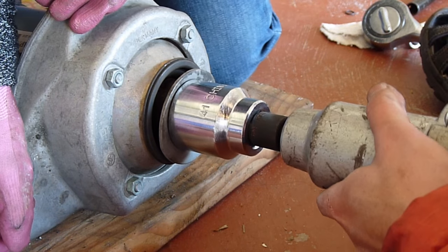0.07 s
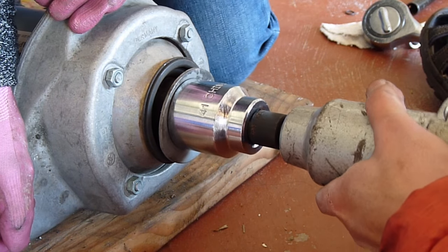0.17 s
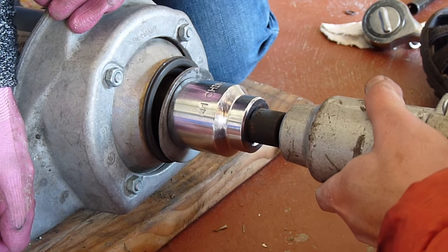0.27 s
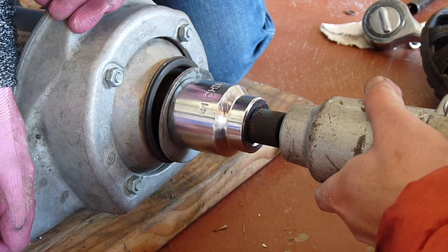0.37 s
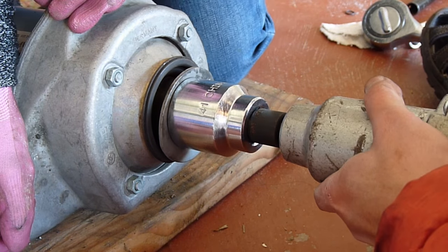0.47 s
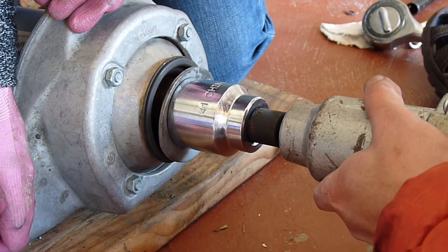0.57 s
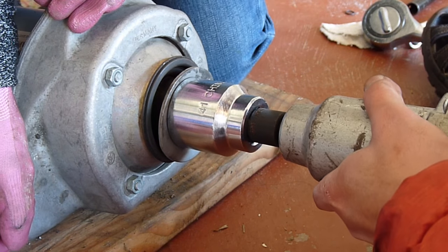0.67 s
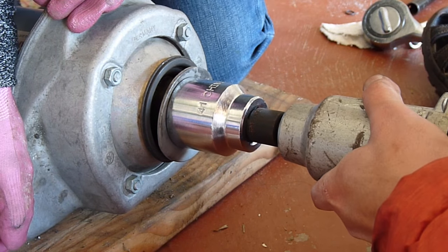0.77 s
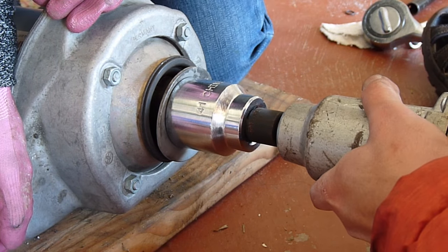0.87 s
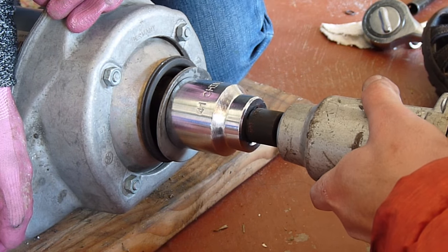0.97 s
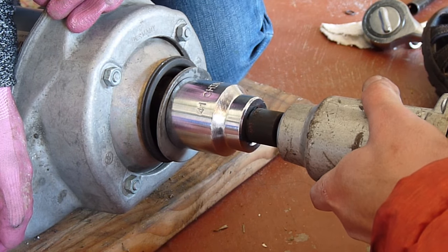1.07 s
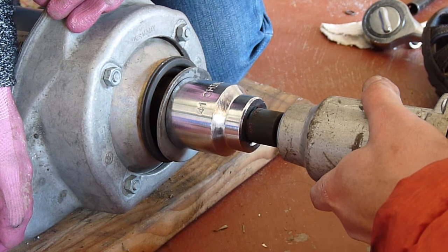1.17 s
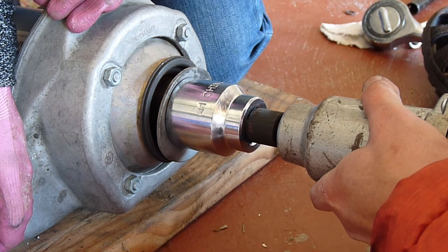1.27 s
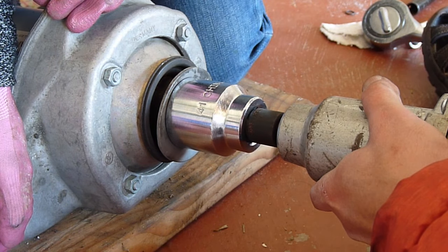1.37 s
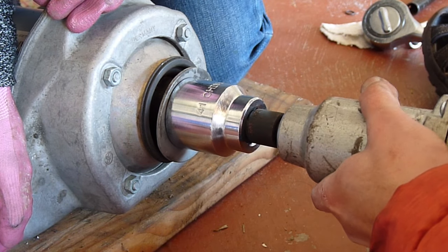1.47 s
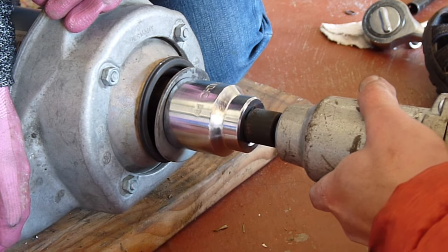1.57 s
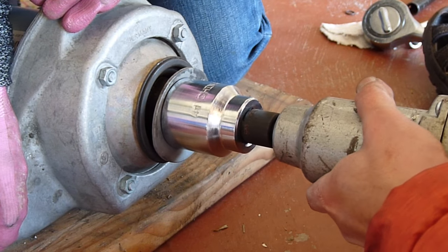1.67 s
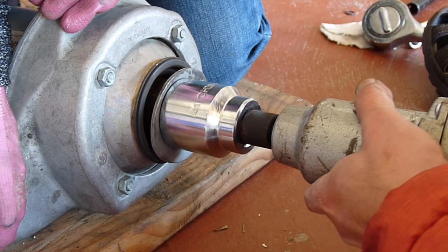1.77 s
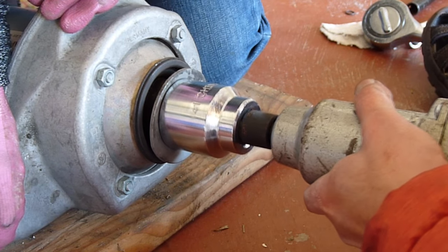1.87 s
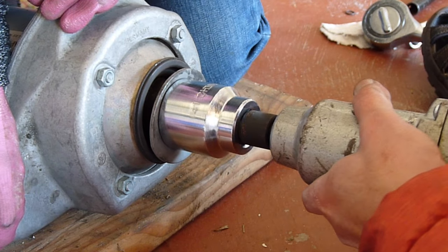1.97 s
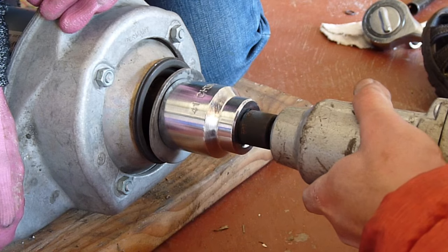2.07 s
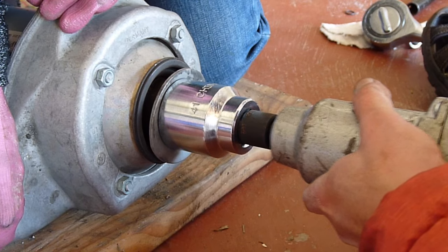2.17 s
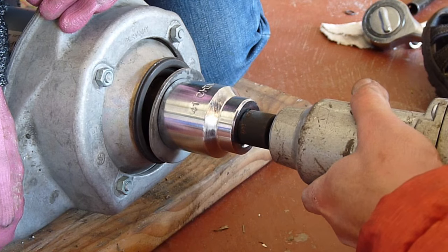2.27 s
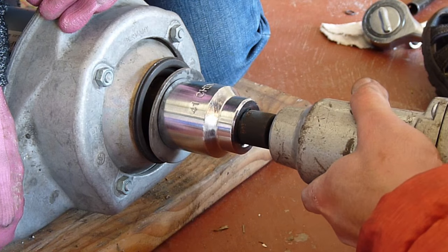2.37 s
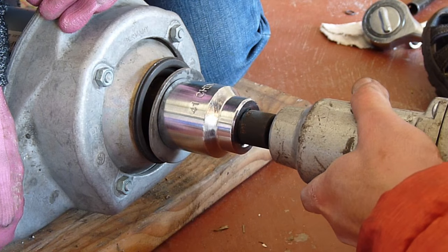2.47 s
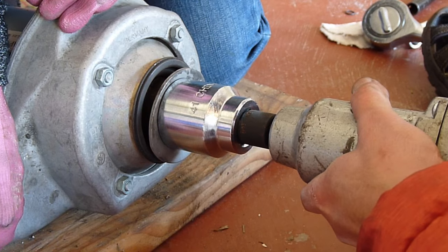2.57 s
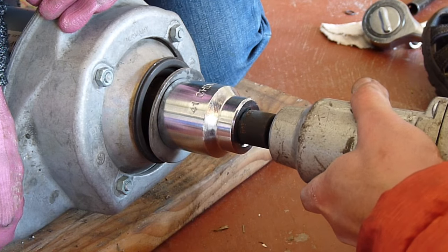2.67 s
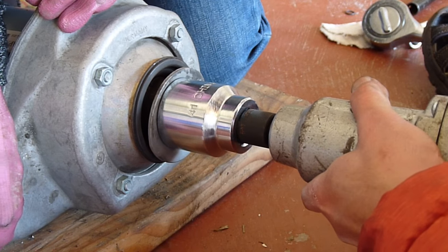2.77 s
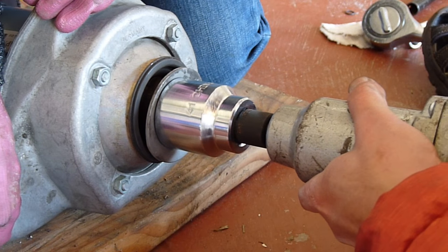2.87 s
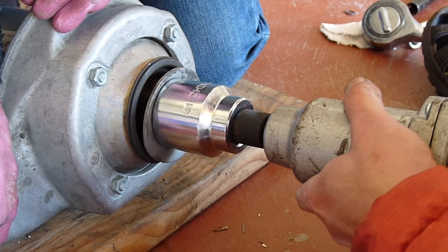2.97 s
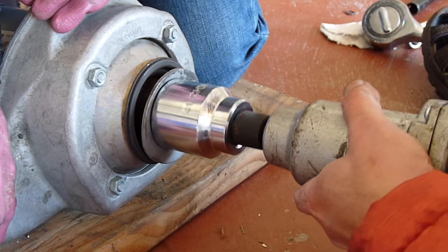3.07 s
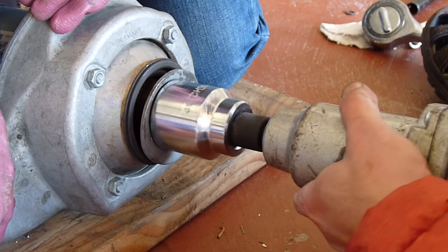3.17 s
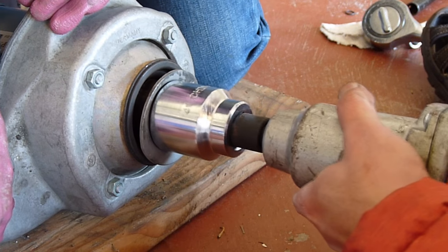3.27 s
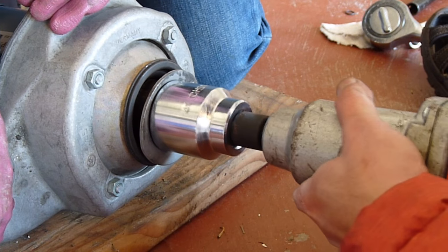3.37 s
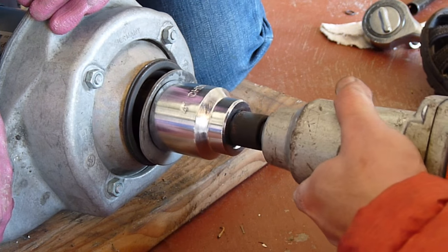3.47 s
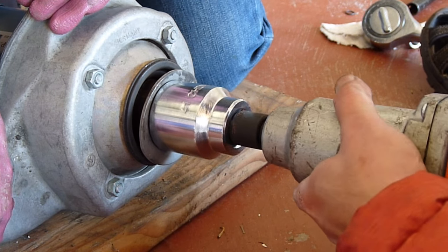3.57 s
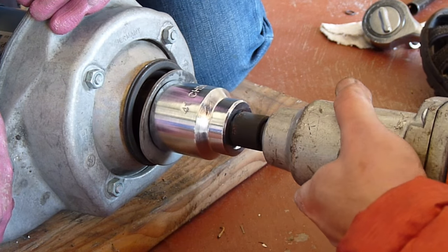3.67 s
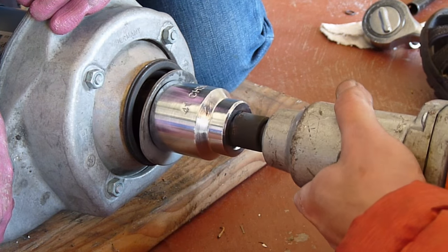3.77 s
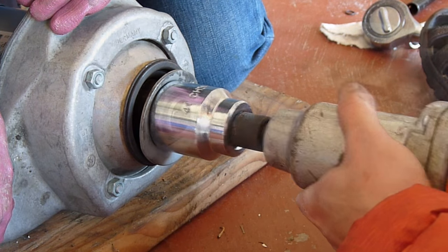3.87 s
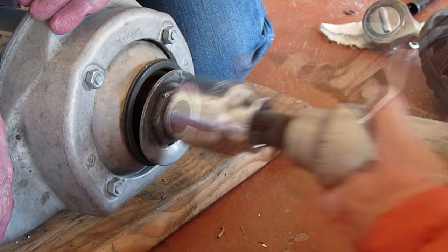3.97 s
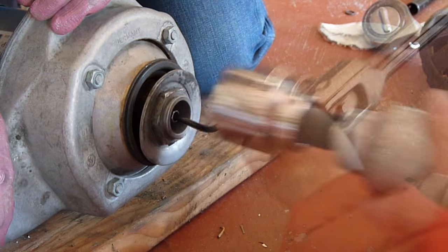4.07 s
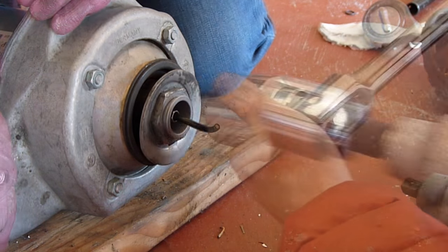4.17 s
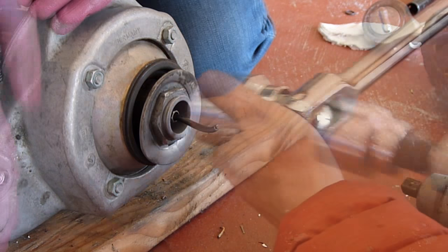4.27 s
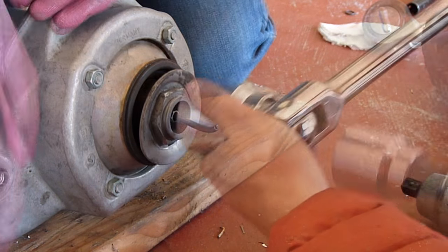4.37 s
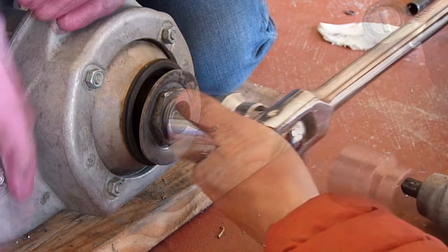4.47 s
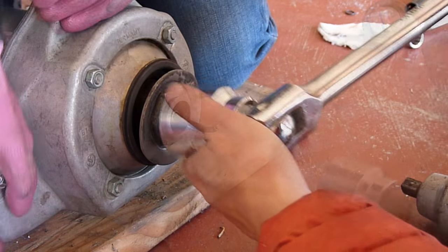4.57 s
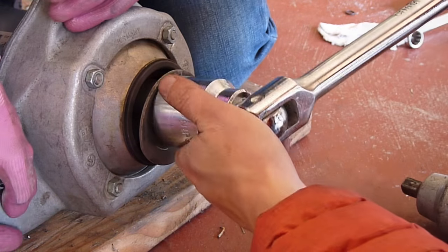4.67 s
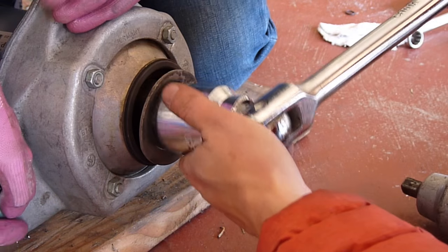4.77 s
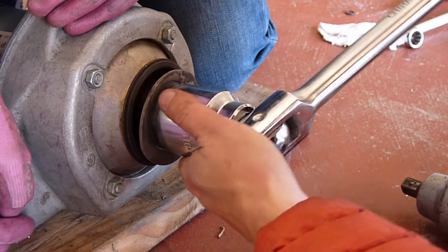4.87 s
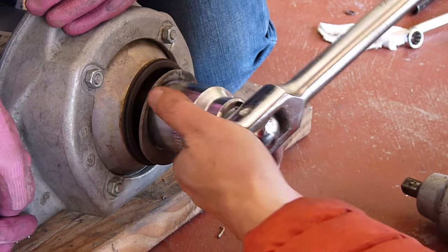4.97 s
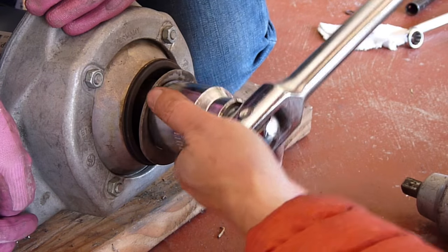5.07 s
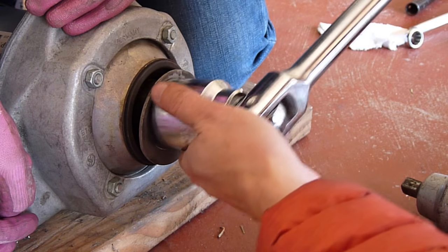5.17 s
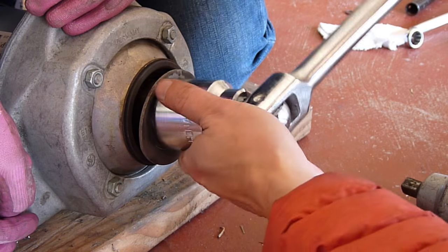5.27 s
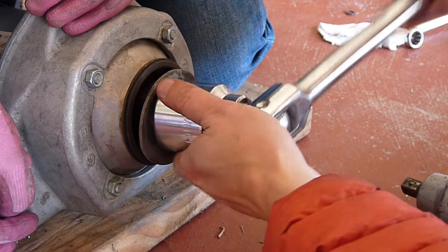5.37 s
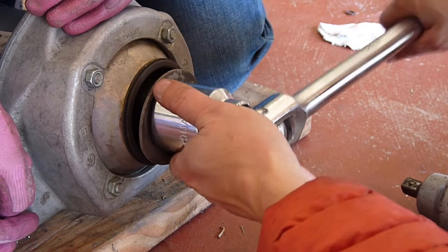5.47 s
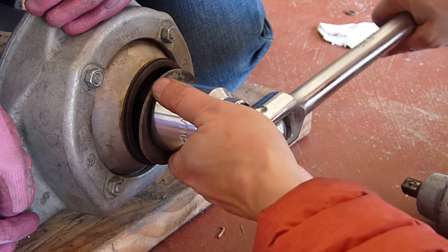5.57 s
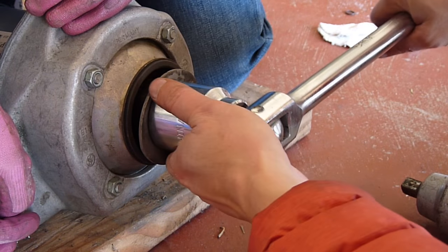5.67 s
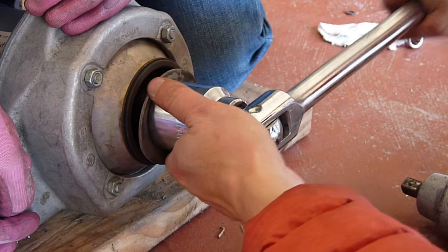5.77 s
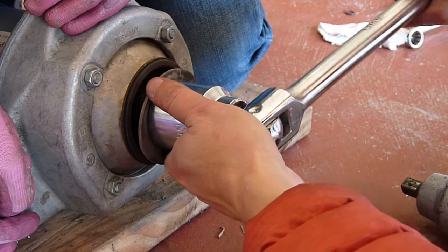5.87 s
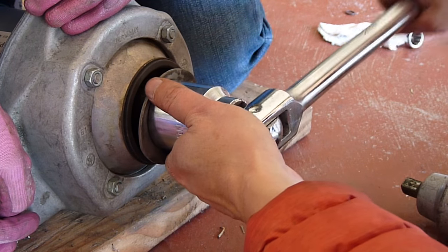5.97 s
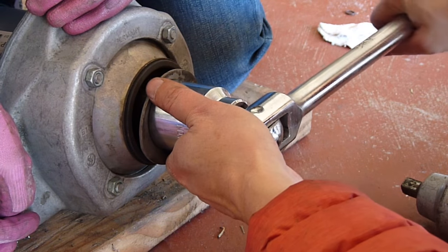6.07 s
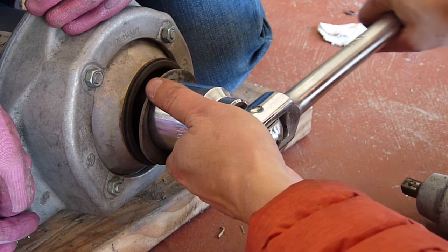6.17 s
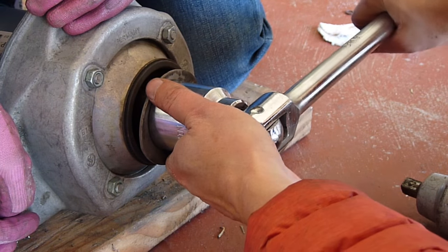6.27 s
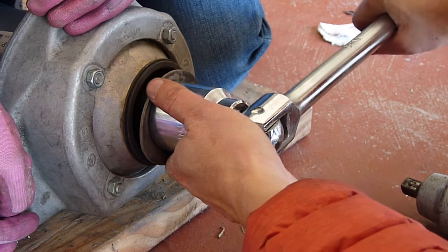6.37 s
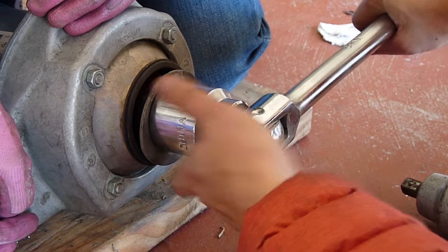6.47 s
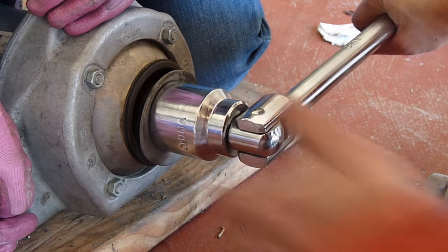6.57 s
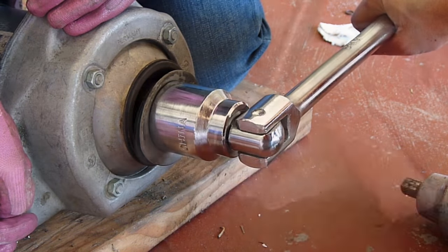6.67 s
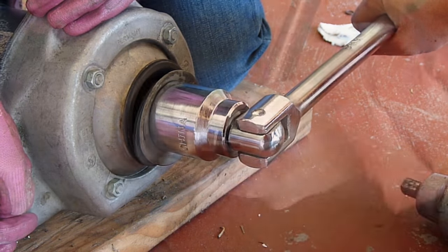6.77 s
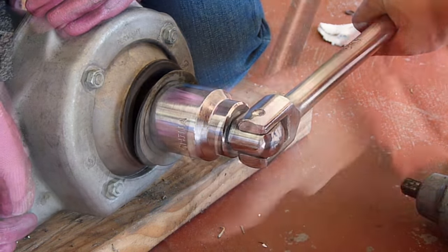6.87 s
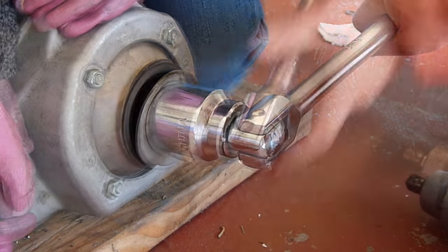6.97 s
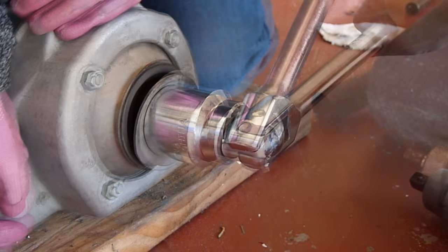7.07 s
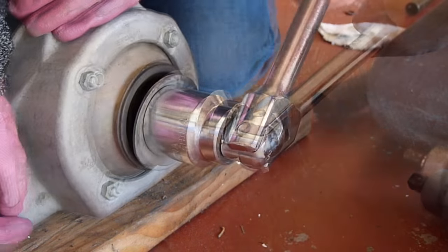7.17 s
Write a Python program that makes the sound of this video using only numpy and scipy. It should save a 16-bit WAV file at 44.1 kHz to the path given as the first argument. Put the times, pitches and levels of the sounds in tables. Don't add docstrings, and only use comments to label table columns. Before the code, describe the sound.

An impact wrench hammers in two rattling bursts that speed up and run down, then quiet socket knocks, one firm snap and sleeve rustle.

```python
import sys
import numpy as np
from scipy import signal
from scipy.io import wavfile
from scipy.ndimage import uniform_filter1d

SR = 44100
rng = np.random.default_rng(int(sys.argv[2]) if len(sys.argv) > 2 else 0)


def generate_wav(sig):
    pcm = np.round(np.clip(np.atleast_2d(sig).T, -1, 1) * 32767).astype(np.int16)
    wavfile.write(sys.argv[1], SR, pcm)


def makeup_ratio(level_db):
    decades = np.asarray(level_db, float) / 20
    return 10 ** decades


N = 319217

# (trigger pulled [s], released [s], first full blow [s], hammer stalls [s])
TRIGGER = [
    (1.5043, 1.7314, 1.562, 2.3),
    (2.726, 3.0979, 2.7755, 3.69),
]
# (top speed [blows/s], spin-up [s], coasting [s], drag [blows/s])
MOTOR = [
    (43.574, .0787, .9787, 38.975),
    (46.185, .1151, .6005, 13.773),
]
# (from [s], to [s], start level [dB], end level [dB])
LURCHES = [
    (1.485, 1.555, -48.5, -31),
    (2.746, 2.853, -42, -58.5),
]
# (time [s], peak [dB], brightness [dB])
LOOSE_HITS = [(1.503, -19, -24), (1.515, -16.5, -31.5), (1.528, -11.5, -27.5), (1.548, -28.5, -17),
              (1.554, -10.5, -21.5), (1.561, -18, -9.5), (2.153, -24, -13), (2.24, -26, -38),
              (2.425, -38, -28.5), (2.437, -39.5, -25), (2.479, -35.5, -41.5), (2.749, -53, 2.5),
              (3.725, -38, 1)]
# (time [s], deaf time [ms], jerk [dB])
CHOKES = [
    (1.7089, 2.8, -21),
    (1.7333, 6.3, -19.5),
    (2.940, 6.9, -22.5),
    (3.181, 9, -21),
    (3.237, 0.93, -21),
]
# (frequency [Hz], level [dB], t60 [s])
ANVIL_MODES = [(600, 0, .02), (950, -3, .02), (1340, -2, .02), (1560, -4, .02), (2185, -2, .035),
               (2880, -6, .02)]
# (frequency [Hz], level [dB], t60 [s])
HUB_MODES = [(365, 0.5, 0.12), (471, 2, 0.056), (630, 8, 0.02), (701, 17, 0.016), (890, -1.5, 0.021),
             (1380, -24, 0.071), (2265, -24, 0.13)]
# (frequency [Hz], density [dB per Hz])
WHIRR_TONE = [(200, -24.5), (350, 2), (470, -11), (600, 3.5), (950, -5), (1330, -6.5), (1700, -5.5),
              (2200, -8.5), (2700, -11.5), (3300, -19), (3650, -27), (4400, -27.5), (7000, -65),
              (9000, -78.5)]
# (time [s], peak [dB], brightness [dB], contact [s])
KNOCKS = [(4.736, -32, -17, 0.0042), (4.831, -28, -23, 0.0048), (4.867, -39.5, -14.5, 0.0037),
          (4.955, -46.5, -17, 0.0013), (5.067, -24, -21.5, 0.012), (5.171, -30, -46, 0.0048),
          (5.245, -28.5, -32, 0.0013), (5.414, -32.5, -22.5, 0.0023), (5.478, -33, -45, 0.0024),
          (5.505, -49, -32.5, 0.0027), (5.547, -36.5, -11, 0.0035), (5.56, -27.5, -34, 0.0015),
          (5.722, -34, -39, 0.0068), (5.772, -38.5, -44.5, 0.0059), (5.904, -58.5, -14.5, 0.0037),
          (5.915, -34.5, -17, 0.0038), (6.007, -41, -27, 0.0031), (6.126, -48, -36, 0.017),
          (6.142, -31, -16.5, 0.0037), (6.414, -43, -30, 0.0018), (6.567, -50.5, -4.5, 0.0044),
          (6.718, -44.5, -12, 0.0024), (6.755, -43.5, -5, 0.0074), (7.113, -41.5, -22, 0.0035)]
# (time [s], peak [dB], contact [s], top frequency [Hz])
TOUCHES = [
    (5.019, -35, 0.0042, 900),
    (5.035, -40, 0.0019, 1272),
    (5.366, -39.5, 0.0067, 835),
    (7.184, -43, 0.011, 296),
    (7.205, -36.5, 0.0098, 296),
    (7.18, -52, 0.013, 1182),
    (7.208, -43, 0.025, 1133),
]
# (time [s], level [dB], frequency [Hz], t60 [s])
SEATING = [
    (5.0521, -12.3, 540, .009),
]
# (peak [s], scrape level [dB], rise [s], fall [s], dull drag level [dB])
STROKES = [
    (4.371, -64, 0.47, 0.12, -78),
    (4.619, -60, 0.28, 0.23, -71.5),
    (4.861, -65, 0.14, 0.23, -66),
    (5.181, -62.5, .2, 0.13, -56),
    (5.299, -76, 0.36, 0.36, -58),
    (5.548, -75.5, 0.28, 0.13, -62),
    (6.72, -59, 0.22, 0.13, -67.5),
    (6.869, -62, 0.26, 0.31, -56),
    (7.2, -60.5, 0.11, .1, -67.5),
]
# (frequency [Hz], density [dB per Hz])
RUSTLE_TONE = [(180, -40.5), (300, -3), (480, 5), (534, -7), (1580, -6), (2170, -12), (3200, -19),
               (4050, -32.5), (5000, -43), (6500, -66.5), (11000, -120)]
# (frequency [Hz], t60 [s])
SHOP_DECAY = [(200, 0.2), (1000, 0.16), (3000, 0.09)]
FAR_TONE = [(15, -53), (25, -12), (32, -14), (54, -27.5), (86, 2), (128, -2.5), (200, -1.5), (306, -11),
            (341, -11), (489, -15), (763, -13), (985, -23.5), (1330, -26.5), (2120, -39), (4000, -54.5),
            (5200, -84.5), (8800, -120)]
FAR_LEVEL = [(0, -43.5), (.87, -45.5), (1.5, -48), (2.3, -67), (2.55, -66.5), (2.75, -65), (3.7, -77.5),
             (3.95, -75.5), (4.15, -75), (4.8, -85)]
# (frequency [Hz], density [dB per Hz])
LATE_TONE = [(15, -34), (25, -16), (33, -41), (115, -2), (273, -14), (386, -18.5), (441, -25), (515, -20),
             (624, -25.5), (687, -22), (1180, -33.5), (1250, -37), (2500, -52), (3250, -68), (5500, -120)]
# (frequency [Hz], level [dB])
WHINE = [(6659, -90)]
# (time [s], offset [steps])
OFFSET_STEPS = [(2.7, -5.6), (3.78, -6.85), (3.96, -6.45), (4.09, -6), (4.2, -5.55)]

FULL_SPEED_PER_S, REBOUND_TURN, CRACK_LEAD_S = 42, .26, .0018
CRACK_DB, CRACK_SPREAD_DB, CRACK_SLOPE_DB, BRIGHT_DB, BRIGHT_SPREAD_DB = -23, 1.5, -1, -10, 4
REBOUND_DB, REBOUND_LOSS_DB = -18, 26
RING_SPREAD_DB, ANVIL_RING_DB, HUB_RING_DB = 2.5, -5, -1.5
JOLT_DB, JOLT_SPREAD_DB = -24.5, 1.2
JOLT_DRIVEN_SLOPE_DB, JOLT_COAST_SLOPE_DB = 24, 36
WHIRR_DB, WHIRR_FADE_DB_PER_S = [-37.5, -40], [83.5, 170]
WHIRR_SLOPE_DB = 15
ENGAGE_DB, ENGAGE_S = -12, 0.036
RATTLE_DB, RATTLE_S = 3, 0.0077
SHAFT_HZ, SHAFT_WIDTH_HZ, SHAFT_DB = 2183, 30, 2
STROKE_DROP_DB = 20
DRONE_DB, LATE_DB, LATE_DRONE_DB, LAST_DB = -2.5, -59, -66.5, -57
FAR_PATCHY_DB = 1.0
MIC_HZ, MIC_SHELF_DB = 3200, -17.5
RATE_HZ, STEP, LATE_OFFSET_STEPS, CIRCUIT_DB = 16000, 1 / 1024, -5.9, -79.5
FADE_S, LAST_FADE_S = (3.93, 4.75), (6.94, 7.71)


def wrench():
    bursts = [(trigger, *hammer(*trigger, *motor)) for trigger, motor in zip(TRIGGER, MOTOR)]
    cracks = hammer_cracks(bursts)
    return cracks + makeup_ratio(-12) * shop(cracks) + hammer_jolts(bursts) + gears(bursts)


def hammer(pulled_s, released_s, first_s, stall_s, top, spin_up_s, coasting_s, drag):
    t = np.arange(N) / SR
    powered_s = np.clip(t - pulled_s, 0, released_s - pulled_s)
    held = top * (1 - np.exp(-powered_s / spin_up_s))
    coast = np.exp(-np.maximum(t - released_s, 0) / coasting_s)
    speed = np.maximum((held + drag) * coast - drag, 1)
    turns = np.cumsum(speed * (t >= first_s)) / SR + 1e-9 * t
    whole = np.arange(np.ceil(turns[round(stall_s * SR)]))
    blows = np.interp(whole, turns, t) + first_s * (whole == 0)
    return speed, blows, np.interp(whole + REBOUND_TURN, turns, t)


def hammer_cracks(bursts):
    cracks = np.zeros(N)
    for _, speed, blows, rebounds in bursts:
        for s, back_s in zip(blows, rebounds):
            share = speed[round(s * SR)] / FULL_SPEED_PER_S
            crack_db = CRACK_DB + CRACK_SLOPE_DB * share + CRACK_SPREAD_DB * rng.standard_normal()
            bright_db = BRIGHT_DB + BRIGHT_SPREAD_DB * rng.standard_normal()
            rebound_db = REBOUND_DB - REBOUND_LOSS_DB * share
            for hit_s, db, bright in [(s, crack_db, bright_db), (back_s, rebound_db, BRIGHT_DB)]:
                add(cracks, hit_s - CRACK_LEAD_S, strike(ANVIL_MODES, db - 4.5, bright, 0.0038, ANVIL_RING_DB))
    for s, db, bright_db in LOOSE_HITS:
        add(cracks, s, strike(HUB_MODES, db - 5.0, bright_db, 0.0035, -4))
    return cracks


def hammer_jolts(bursts):
    jolts, t = np.zeros(N), np.arange(-200, 900) / SR
    jolt = -np.exp(-(t / 0.0012) ** 2) + 0.017 * np.exp(-((t - .005) / 0.0083) ** 2)
    for (_, released_s, _, _), speed, blows, _ in bursts:
        for s in blows:
            if min(abs(s - row[0]) for row in CHOKES) > .005:
                slope_db = JOLT_COAST_SLOPE_DB if s > released_s else JOLT_DRIVEN_SLOPE_DB
                share = speed[round(s * SR)] / FULL_SPEED_PER_S
                db = JOLT_DB + slope_db * np.log10(share) + JOLT_SPREAD_DB * rng.standard_normal()
                add(jolts, s + t[0], makeup_ratio(db) * jolt)
    return jolts


def gears(bursts):
    now = np.arange(N) / SR
    gain = sum(level([(a, a_db), (b, b_db)]) for a, b, a_db, b_db in LURCHES)
    for (trigger, speed, blows, _), full_db, fade in zip(bursts, WHIRR_DB, WHIRR_FADE_DB_PER_S):
        _, _, first_s, stall_s = trigger
        turning = speed[np.minimum(np.arange(N), round(stall_s * SR))]
        last_blow = np.maximum(np.searchsorted(blows, now + CRACK_LEAD_S) - 1, 0)
        db = full_db + WHIRR_SLOPE_DB * np.log10(turning / FULL_SPEED_PER_S)
        db = db + RATTLE_DB * np.exp(-abs(now - blows[last_blow]) / RATTLE_S)
        db = db + ENGAGE_DB * np.exp(-abs(now - first_s) / ENGAGE_S)
        db = db - fade * np.maximum(now - stall_s, 0)
        gain = gain + (now > first_s) * makeup_ratio(db)
    motor = noise(WHIRR_TONE, 1.6, lo_hz=400, hi_hz=3500, size=256, drive=grit(3000, 1.5, .0015))
    singing = signal.lfilter(*signal.iirpeak(SHAFT_HZ, SHAFT_HZ / SHAFT_WIDTH_HZ, fs=SR), motor)
    return (motor + makeup_ratio(SHAFT_DB) * singing) * gain


def strike(modes, db, bright_db, contact_s, ring_db):
    t = np.arange(2600) / SR
    chatter = rng.standard_normal(len(t))
    ringing = np.zeros(len(t))
    for hz, mode_db, t60 in modes:
        luck, detune = rng.standard_normal(2)
        decay = makeup_ratio(mode_db + RING_SPREAD_DB * luck - 60 * t / t60)
        ringing += decay * np.sin(2 * np.pi * hz * (1 + .03 * detune) * t)
    fall = np.exp(-t / contact_s) + 0.073 * np.exp(-t / (5 * contact_s))
    contact = chatter * np.minimum(t / 0.00014, 1) * fall
    body = signal.fftconvolve(contact, ringing)[:len(t)]
    bright = band(contact * np.sign(chatter[::-1]), 1150, 3100, order=1)
    clack = band(contact, 190, 1350, order=4) + makeup_ratio(bright_db + 9) * bright
    sound = dull(makeup_ratio(ring_db) * evened(body) + evened(clack))
    return makeup_ratio(db) * sound / abs(sound).max()


def socket():
    x, t = np.zeros(N), np.arange(3000) / SR
    for s, db, bright_db, contact_s in KNOCKS:
        add(x, s, strike(HUB_MODES, db, bright_db - 1, contact_s, HUB_RING_DB))
    for s, db, contact_s, top_hz in TOUCHES:
        press = rng.standard_normal(len(t)) * t * np.exp(-2 * t / contact_s)
        touch = band(press, top_hz / 2, top_hz, order=3)
        add(x, s, makeup_ratio(db) * touch / abs(touch).max())
    for s, db, hz, t60 in SEATING:
        onset = np.sin(np.pi / 2 * np.minimum(t / .0012, 1))
        snap = -np.sin(2 * np.pi * hz * t) * onset * makeup_ratio(db + 7 - 60 * t / t60)
        add(x, s, band(snap, 130, 6500, order=1))
        add(x, s, strike(HUB_MODES, db - 13, 2, .0014, -4))
    x = band(x, 110, 7000, order=1)
    return x + makeup_ratio(-10.5) * shop(x)


def rustle():
    cloth = noise(RUSTLE_TONE, 1.2, 1200, 3000, size=256, drive=grit(2500, 1.2, 0.003))
    return cloth * strokes(column=1)


def strokes(column):
    t = np.arange(0, N + 50, 50) / SR
    gain = np.zeros(len(t))
    for row in STROKES:
        peak_s, rise_s, fall_s = row[0], row[2], row[3]
        away = np.maximum((peak_s - t) / rise_s, (t - peak_s) / fall_s)
        gain += makeup_ratio(row[column] - STROKE_DROP_DB * away)
    return np.interp(np.arange(N) / SR, t, gain)


def grit(per_s, spread_db, tail_s):
    sizes = makeup_ratio(spread_db * np.minimum(rng.exponential(1, N), 4)) * (rng.random(N) < per_s / SR)
    return evened(.5 + signal.lfilter([1], [1, -np.exp(-1 / (tail_s * SR))], sizes))


def shop(x):
    taps = np.zeros(SR // 2)
    at = np.arange(300, len(taps) - 20, 20) + rng.integers(0, 20, (len(taps) - 301) // 20)
    taps[at] = rng.choice([-1., 1.], len(at))
    hz, t, z = signal.stft(taps, SR, nperseg=256)
    tail = signal.istft(z * makeup_ratio(-60 * t / read(SHOP_DECAY, hz)[:, None]), SR, nperseg=256)[1]
    return signal.fftconvolve(x, tail / np.linalg.norm(tail))[:N]


def far_machine(tone, patchy_db):
    x = noise(tone, patchy_db, lo_hz=60, hi_hz=250, size=2048)
    rumble = signal.sosfiltfilt(signal.butter(4, 275, fs=SR, output="sos"), x)
    drone = x - rumble
    return rumble, drone / np.std(band(drone, 300, 1200, order=4))


def dull(x):
    low = signal.sosfilt(signal.butter(8, MIC_HZ, fs=SR, output="sos"), x)
    return low + makeup_ratio(MIC_SHELF_DB) * band(x, 3900, 6000)


def choke(x):
    open_share, jerks, t = np.ones(N), np.zeros(N), np.arange(-80, 500) / SR
    jerk = np.where(t < 0, -np.exp(-(t / 0.0008) ** 2), -(1 - t / 0.00053) * np.exp(-t / 0.0012))
    for s, deaf_ms, db in CHOKES:
        add(open_share, s - .0002, -np.ones(round(deaf_ms * SR / 1000)))
        add(jerks, s + t[0], makeup_ratio(db) * jerk)
    return x * uniform_filter1d(open_share, 20) + jerks


def convert(x, offset_steps, share):
    (hz, db), heard, out = WHINE[0], np.flatnonzero(share > 0), np.zeros(N)
    whine = np.sqrt(2) * makeup_ratio(db) * np.sin(2 * np.pi * hz * heard / SR)
    hiss = makeup_ratio(CIRCUIT_DB) * rng.standard_normal(len(heard))
    x = (x + offset_steps * STEP)[heard] + whine + hiss
    steps = np.round(signal.resample_poly(x, RATE_HZ, SR, padtype="line") / STEP)
    out[heard] = signal.resample_poly(steps * STEP, SR, RATE_HZ, padtype="line")[:len(heard)]
    return share * out


def noise(tone, patchy_db, lo_hz, hi_hz, size=1024, drive=1):
    overlap = size * 3 // 4
    hz, _, z = signal.stft(drive * rng.standard_normal(N), SR, nperseg=size, noverlap=overlap)
    patches = rng.standard_normal(z.shape)
    patches = evened(uniform_filter1d(uniform_filter1d(patches, 8, 0), 10, 1))
    gain = makeup_ratio(read(tone, hz)[:, None] + patchy_db * patches)
    x = signal.istft(z * gain, nperseg=size, noverlap=overlap)[1][:N]
    return x / np.std(band(x, lo_hz, hi_hz, order=4))


def band(x, lo_hz, hi_hz, order=2):
    return signal.sosfilt(signal.butter(order, [lo_hz, hi_hz], "bandpass", fs=SR, output="sos"), x)


def evened(x):
    return x / np.sqrt(np.mean(x ** 2) + 1e-20)


def read(points, hz):
    f, value = np.transpose(points)
    return np.interp(np.log(hz + 1), np.log(f + 1), value)


def level(rows):
    s, db = np.transpose(sorted(rows))
    return makeup_ratio(np.interp(np.arange(N) / SR, s, db, -120, -120))


def add(mix, s, sound):
    part = mix[round(s * SR):][:len(sound)]
    part += sound[:len(part)]


def scene():
    t = np.arange(N) / SR
    rumble, drone = far_machine(FAR_TONE, FAR_PATCHY_DB)
    first = wrench() + level(FAR_LEVEL + [(N / SR, -90)]) * (rumble + makeup_ratio(DRONE_DB) * drone)
    rumble, drone = far_machine(LATE_TONE, FAR_PATCHY_DB)
    dragging = (makeup_ratio(LATE_DRONE_DB) + strokes(column=4)) * drone
    second = socket() + rustle() + makeup_ratio(LATE_DB) * rumble + dragging
    third = makeup_ratio(LAST_DB) * np.roll(rumble + makeup_ratio(LATE_DRONE_DB - LATE_DB) * drone, N // 2)
    into_second, into_third = np.interp(t, FADE_S, [0, 1]), np.interp(t, LAST_FADE_S, [0, 1])
    first = convert(choke(first), np.interp(t, *np.transpose(OFFSET_STEPS)), 1 - into_second)
    second = convert(second, LATE_OFFSET_STEPS, into_second - into_third)
    third = convert(third, LATE_OFFSET_STEPS, into_third)
    return (first + second + third)[None]


def top_cut(x):
    return signal.sosfilt(signal.butter(12, 7540, fs=SR, output="sos"), x)


def record(dry):
    mix = signal.sosfiltfilt(signal.butter(16, 7100, fs=SR, output="sos"), dry)
    return top_cut(mix)


dry = scene()
out = record(dry)
generate_wav(out)
```